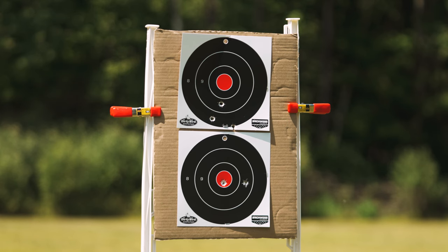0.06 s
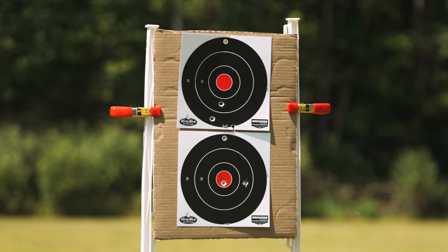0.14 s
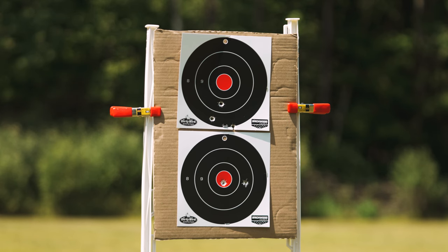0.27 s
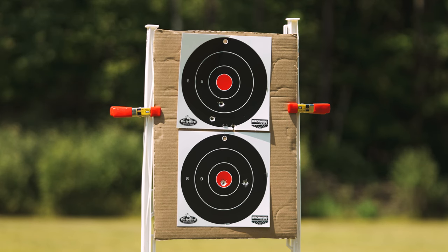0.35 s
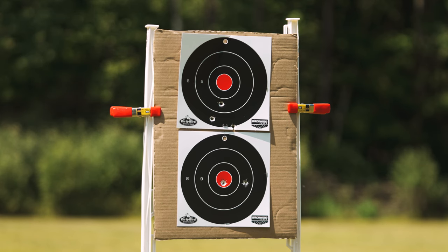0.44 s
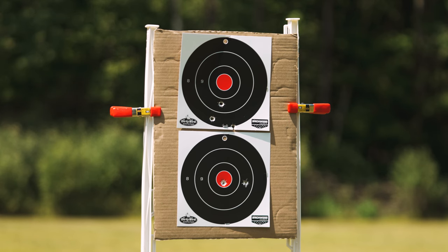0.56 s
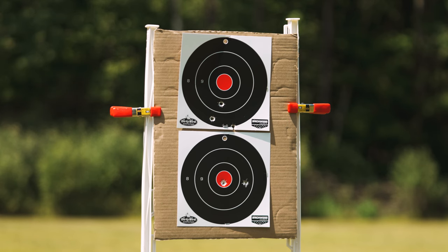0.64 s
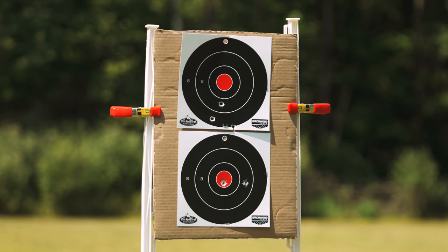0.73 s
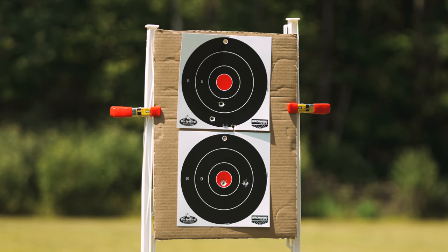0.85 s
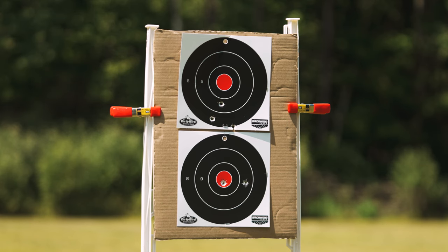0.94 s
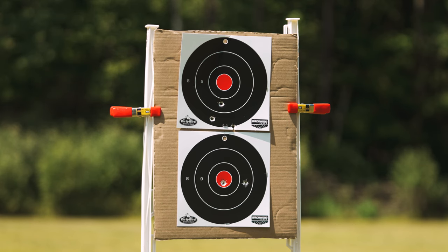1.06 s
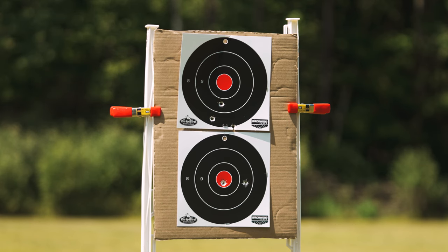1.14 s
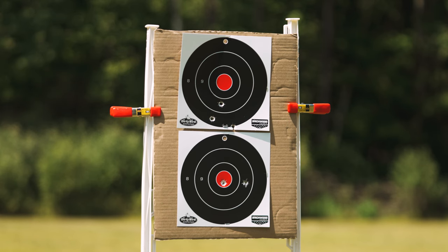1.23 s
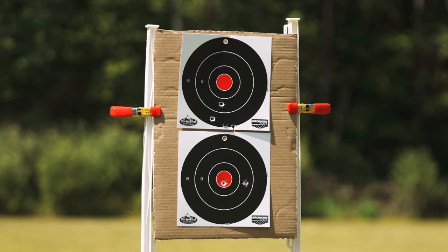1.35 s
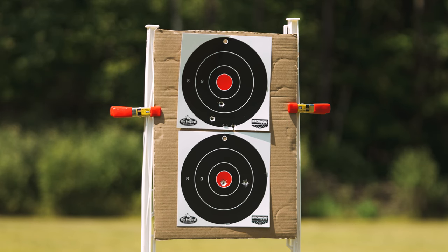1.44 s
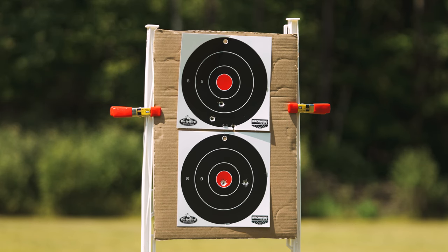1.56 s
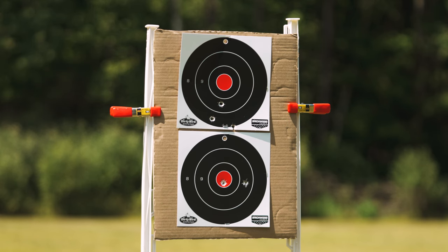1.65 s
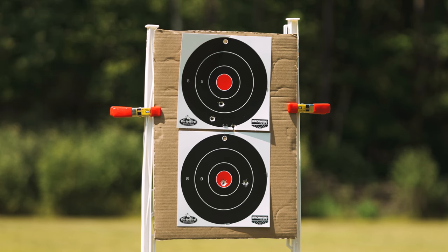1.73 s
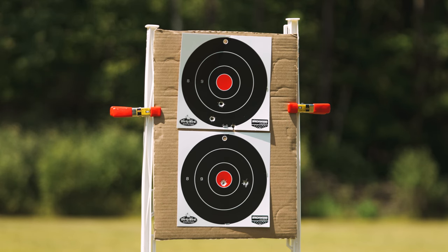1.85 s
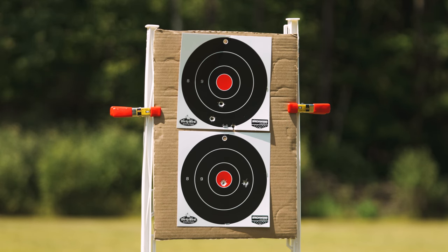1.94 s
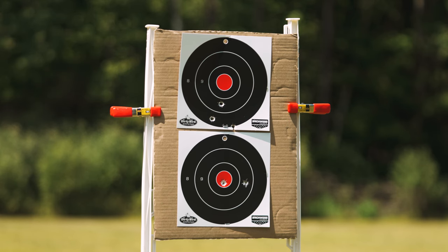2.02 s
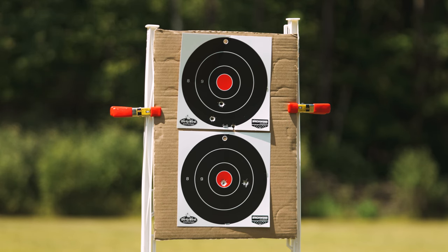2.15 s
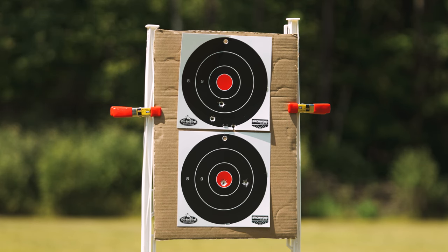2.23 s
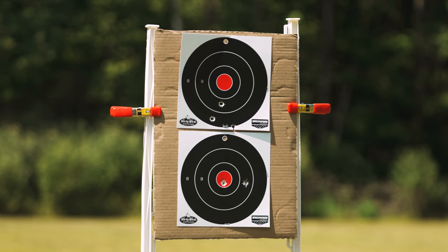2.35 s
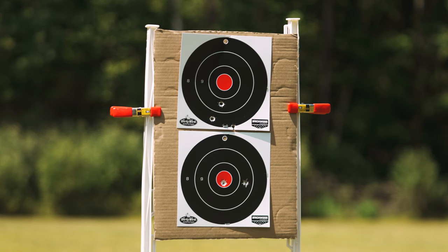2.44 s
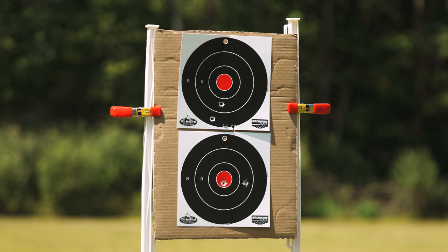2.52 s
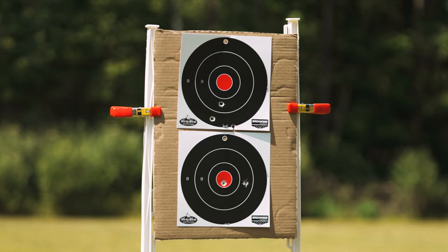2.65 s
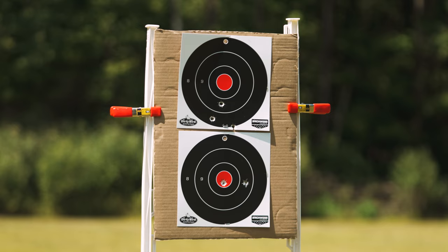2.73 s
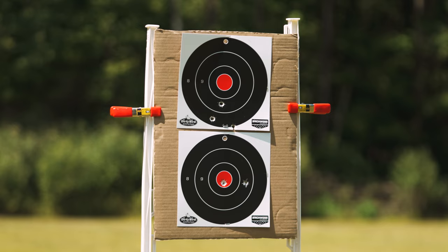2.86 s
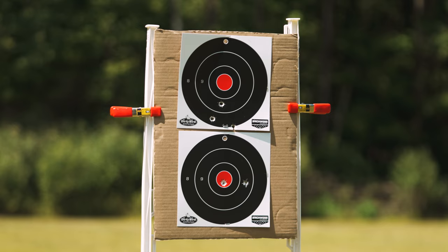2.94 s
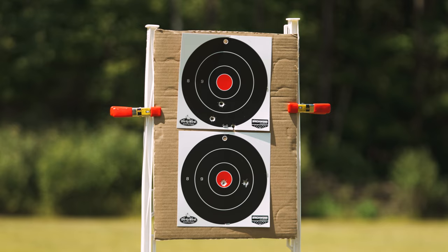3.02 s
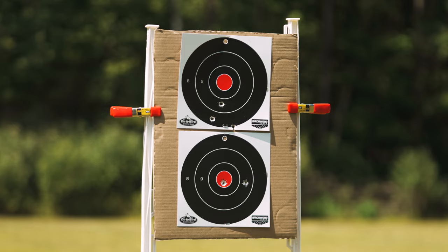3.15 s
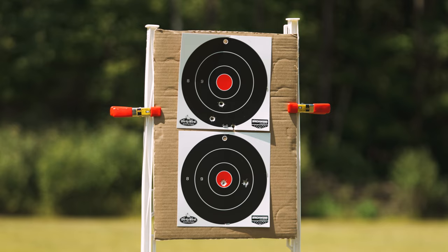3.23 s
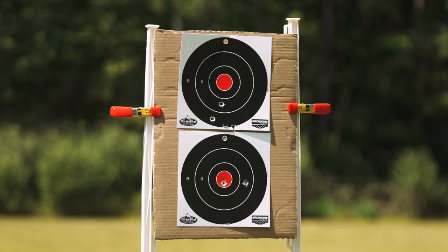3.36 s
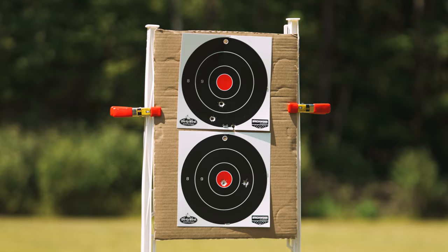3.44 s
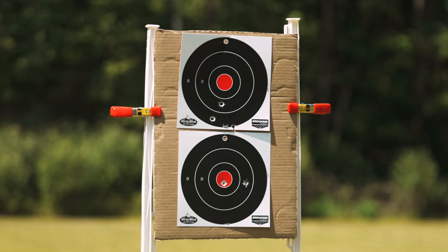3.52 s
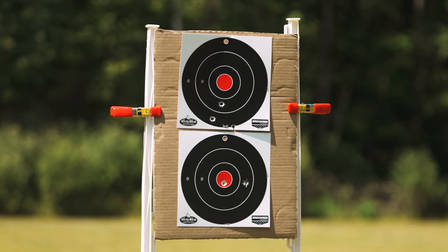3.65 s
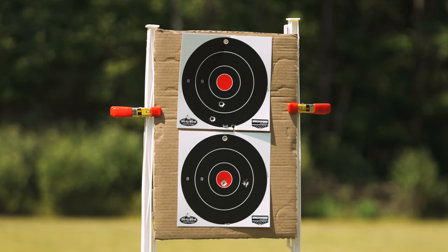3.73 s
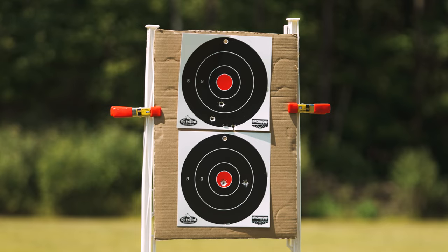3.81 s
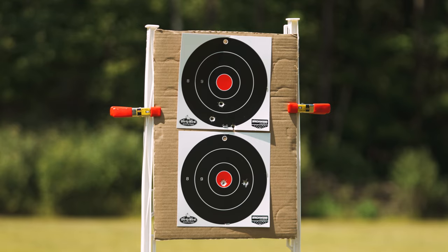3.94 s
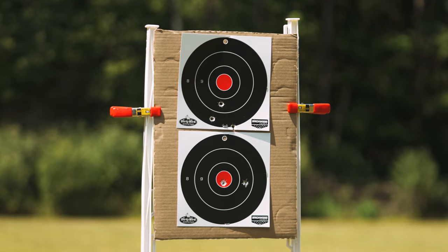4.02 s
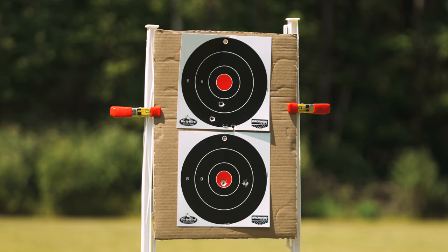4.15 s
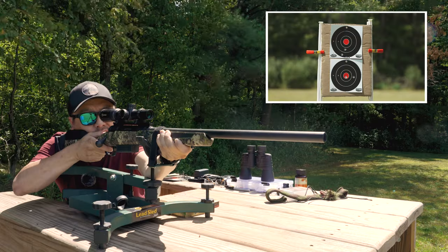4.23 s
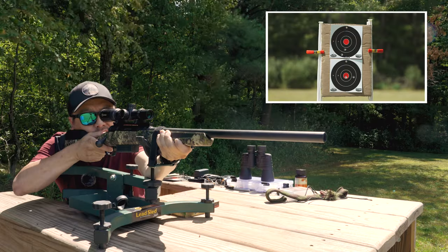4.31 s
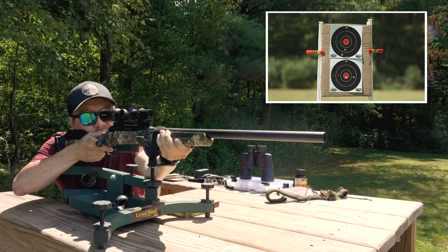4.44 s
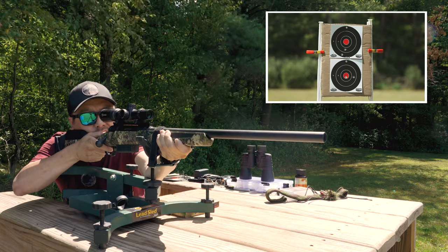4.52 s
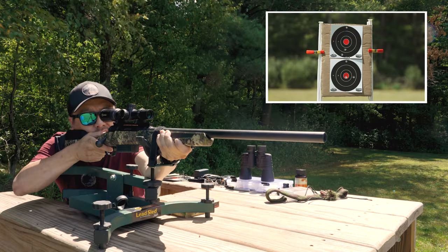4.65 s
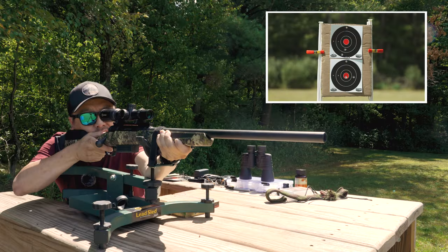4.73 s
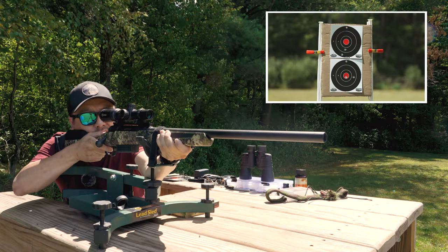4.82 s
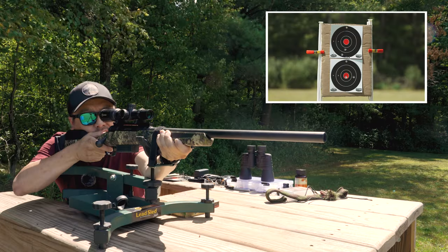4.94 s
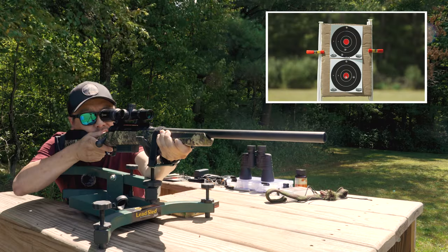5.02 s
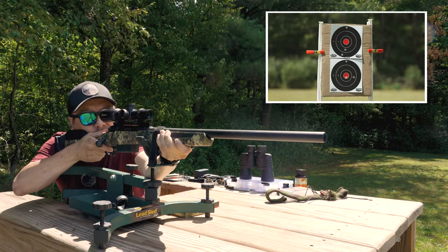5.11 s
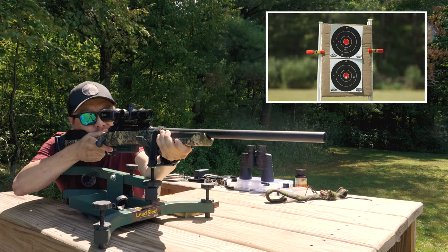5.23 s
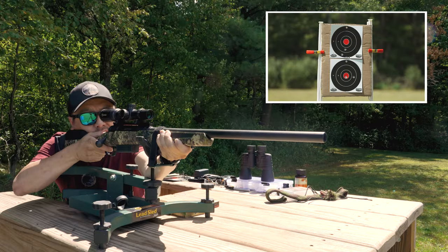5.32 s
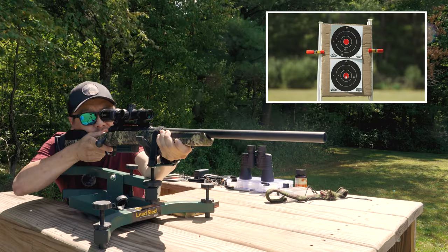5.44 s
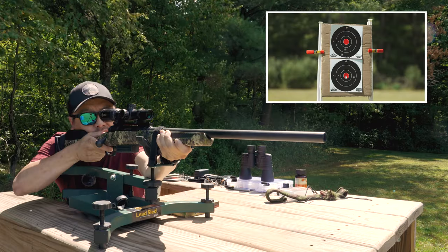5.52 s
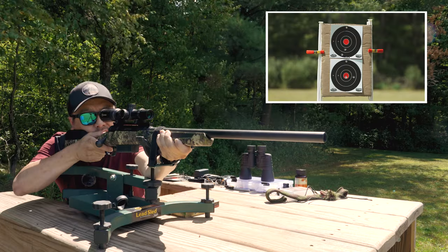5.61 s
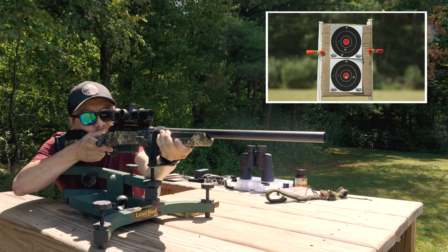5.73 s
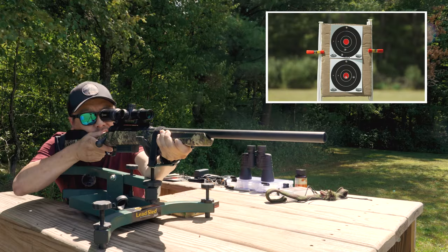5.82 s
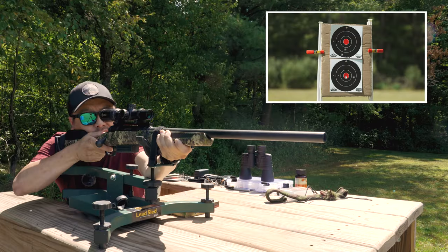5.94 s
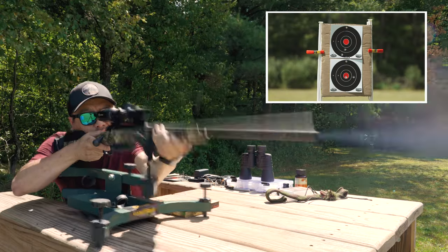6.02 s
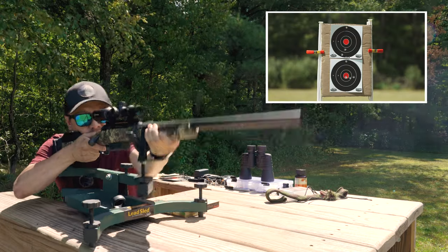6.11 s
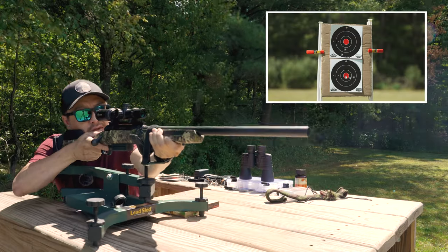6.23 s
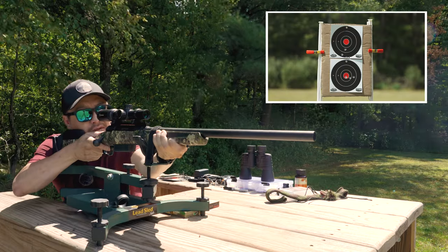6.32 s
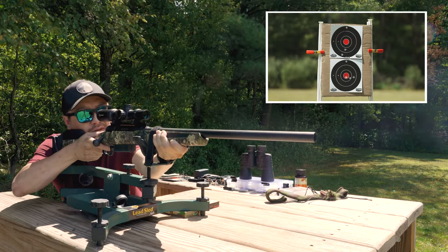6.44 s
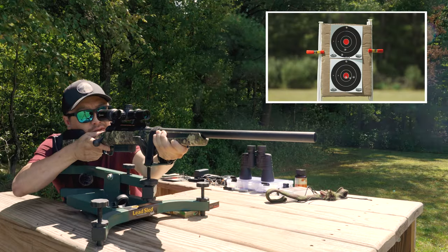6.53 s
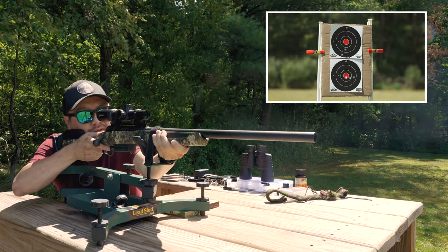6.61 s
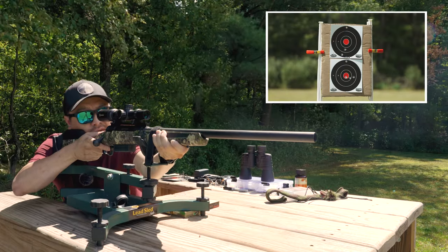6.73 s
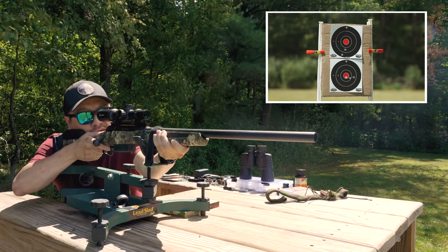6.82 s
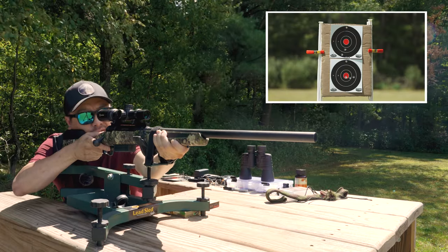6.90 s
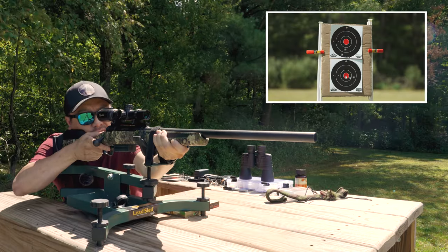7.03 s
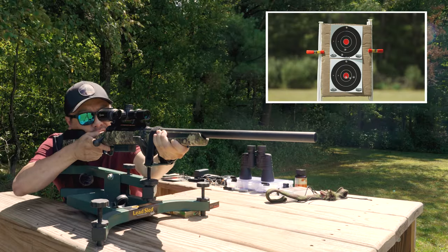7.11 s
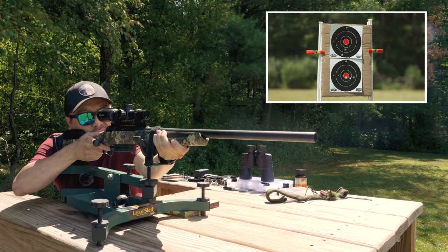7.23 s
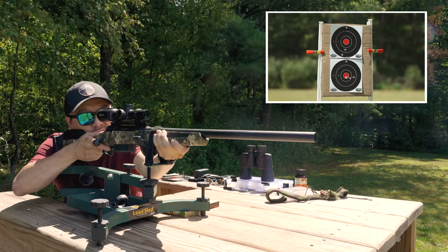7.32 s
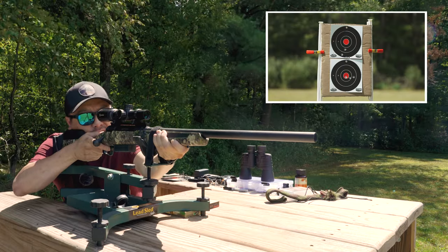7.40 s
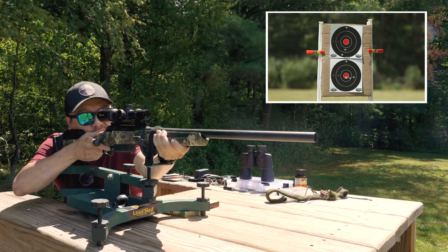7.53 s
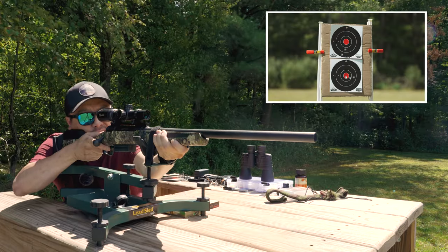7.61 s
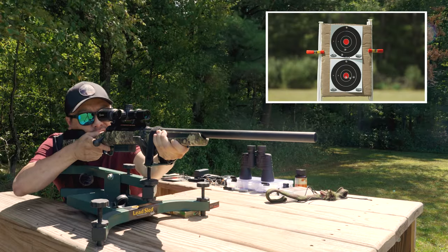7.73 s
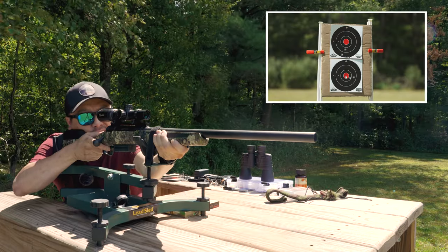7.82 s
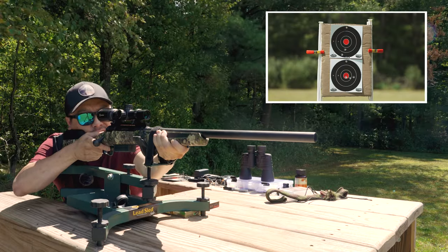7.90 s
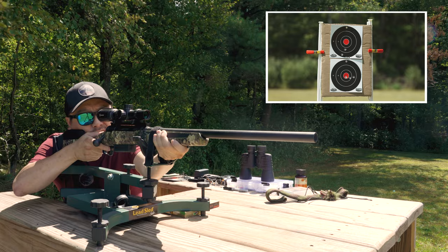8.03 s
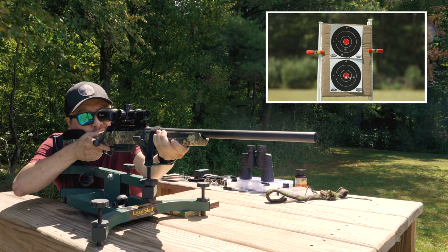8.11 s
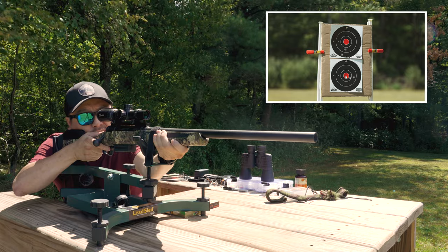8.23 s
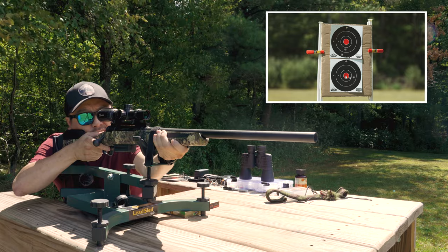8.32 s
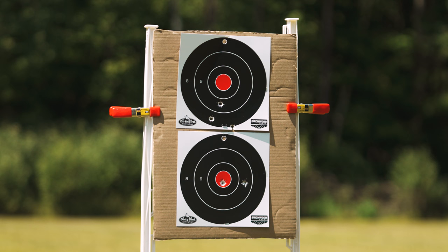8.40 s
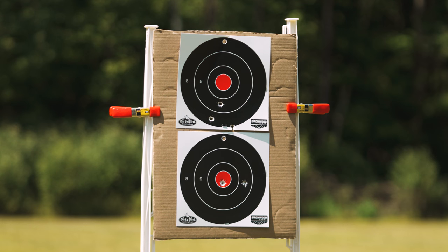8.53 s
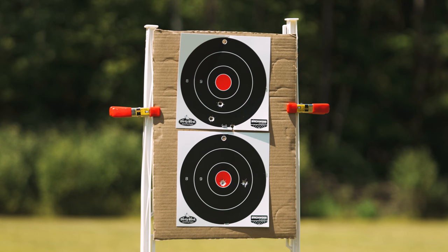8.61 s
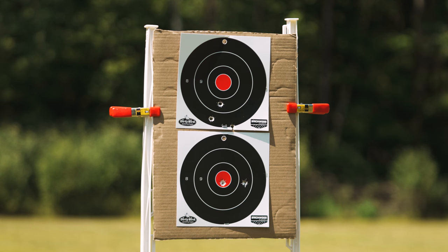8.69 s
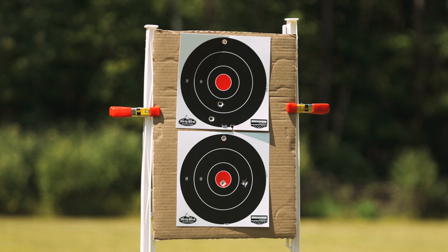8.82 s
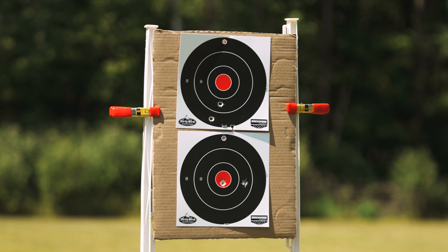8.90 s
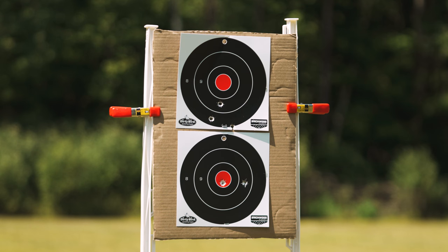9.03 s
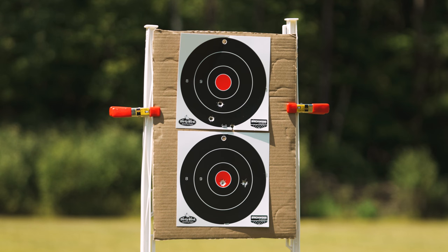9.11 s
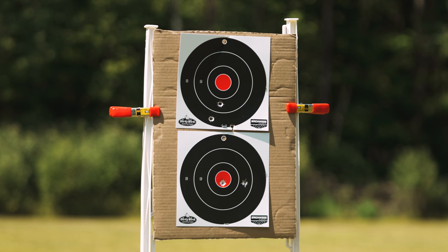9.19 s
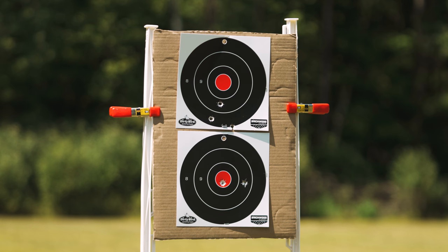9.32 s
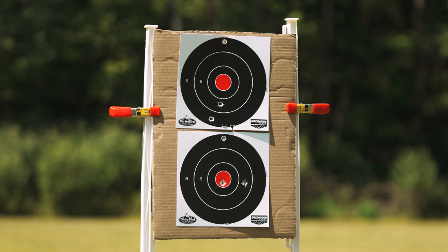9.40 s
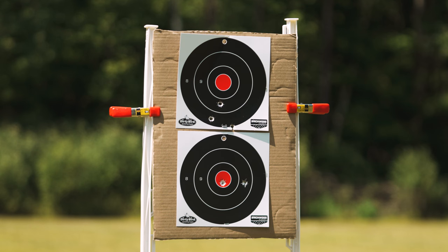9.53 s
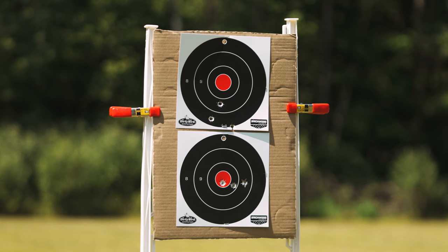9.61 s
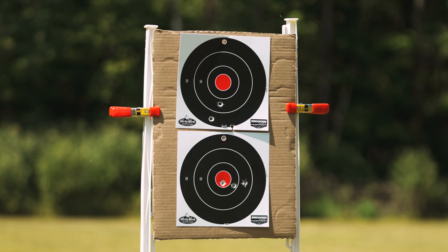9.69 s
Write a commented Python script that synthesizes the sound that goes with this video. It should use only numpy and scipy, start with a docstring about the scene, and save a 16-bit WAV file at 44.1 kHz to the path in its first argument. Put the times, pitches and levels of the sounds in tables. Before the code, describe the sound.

Close to a shooting bench outdoors: a bright metal tinkle with dwindling bounces, two groups of hard steel clicks with hollow knocks, then near silence with leaf hiss, light taps and brief wind rumble. A single distorted blast bursts out, thumping and choking the microphone, followed by a long noisy roll from the woods that loses its treble. Late metallic clacks, a bench bump and sliding steel end it.

```python
"""A shooting bench on a lawn ringed by woods. Leaves hiss faintly as a small metal part drops and bounces.
A gun's action is worked and snapped shut, and puffs of wind touch the microphone. One shot then overloads it
and rolls back from the trees, ever duller; afterwards the gun is handled again.
Struck metal and wood are sums of decaying modes and bursts of banded noise; scraping, leaves, wind and blast
are coloured noise under level curves; the roll is noise whose bands decay at their own rates."""
import sys
import numpy as np
from scipy import signal
from scipy.fft import rfft, irfft
from scipy.io import wavfile
from scipy.ndimage import uniform_filter1d

SR = 44100
rng = np.random.default_rng(int(sys.argv[2]) if len(sys.argv) > 2 else 0)


def output_pcm(signal):
    """Save a mono or channel-first signal as 16-bit PCM at the path in sys.argv[1].

    Samples are clipped to [-1, 1] before scaling.
    """
    pcm = np.clip(np.atleast_2d(signal).T, -1, 1) * 32767
    wavfile.write(sys.argv[1], SR, np.round(pcm).astype(np.int16))


N = 430416
TIME = np.arange(N) / SR  # s
SHOT_S = 6.1218


def undb(db):
    """Level to amplitude: 20 dB is a factor of ten."""
    return 10 ** (np.asarray(db) / 20)


def unit(x):
    """Normalisation by mean power: scale to rms 1."""
    return x / np.sqrt(np.mean(x ** 2) + 1e-18)


def colour(x, points):
    """Spectral shaping: weight x by (f/Hz, level/dB) points, joined over log frequency, at rms 1."""
    hz, db = np.transpose(points)
    bins = np.arange(len(x) // 2 + 1) * SR / len(x)
    gain = undb(np.interp(np.log(bins + 1), np.log(hz), db))
    return unit(irfft(rfft(x) * gain, len(x)))


def band(x, lo_hz, hi_hz, order=2):
    """Causal Butterworth band-pass."""
    edges = [lo_hz, min(hi_hz, SR / 2 - 1)]
    return signal.sosfilt(signal.butter(order, edges, "band", fs=SR, output="sos"), x)


def fade(t60, size=SR):
    """Exponential damping: amplitude falls 60 dB in t60 seconds."""
    return np.exp(-np.log(1000) * TIME[:size] / t60)


def burst(lo_hz, hi_hz, t60, size=8192):
    """High modal density: many dying resonances in one band act as fading noise, near rms 1 at first."""
    shape = fade(t60, size)
    noise = band(rng.standard_normal(size) * shape, lo_hz, hi_hz)
    return unit(noise) * np.sqrt(np.mean(shape ** 2))


def ring(modes, tilt_db=0, centre_hz=1000, scatter_db=3.0):
    """Modal superposition: a blow excites damped sines; tilt_db per octave sets its hardness."""
    hz, db, t60 = np.transpose(modes)
    scatter = scatter_db * rng.standard_normal(len(hz))  # no two blows are quite alike
    gain = undb(db + tilt_db * np.log2(hz / centre_hz) + scatter)
    out = 0
    for k in range(len(hz)):
        out = out + (-1) ** k * gain[k] * fade(t60[k]) * np.sin(2 * np.pi * hz[k] * TIME[:SR])
    return out


def add(out, s, x):
    """Linear superposition: mix x into out at time s."""
    i = min(max(int(s * SR), 0), N)
    out[i:i + len(x)] += x[:N - i]


def grains(spread_db, size=40):
    """Granular excitation: noise in short grains of uneven strength."""
    levels = np.repeat(rng.standard_normal(N // size + 1), size)[:N]
    return rng.standard_normal(N) * undb(spread_db * levels)


def walk(rate):
    """Slow random modulation: stepped noise, rate steps a second, smoothed and scaled to rms 1."""
    k = int(SR / rate)
    steps = np.repeat(rng.standard_normal(N // k + 1), k)[:N]
    return unit(uniform_filter1d(steps, k))


def held(s, hold, fall_db_per_s):
    """Exponential release: gain 1 until hold seconds after time s, then a steady fall in dB."""
    return undb(-fall_db_per_s * np.maximum(TIME - s - hold, 0))


def outdoors():
    """Turbulent noise: leaves hiss almost steadily; wind buffets under brief Gaussian envelopes."""
    # spectrum of the leaves: f/Hz, relative level/dB per Hz
    leaf_colour = [(22, -24), (45, -4), (90, 1.5), (160, 0.5), (280, 0), (480, 1.5), (780, -2),
                   (1300, -5.5), (2300, -12), (5200, -11.5), (8500, -12.5), (11500, -18), (14000, -16.5),
                   (16000, -30)]
    # spectrum of the wind: f/Hz, relative level/dB per Hz
    wind_colour = [(25, -7), (90, -3.5), (170, -3.5), (280, -10), (600, -27), (2000, -73)]
    # puffs on the microphone: t/s at the peak, half length/s (to 1/e), level/dB before flutter
    puffs = [(4.02, .022, -58), (4.32, 0.04546, -52.5), (4.66, 0.13, -53)]
    mean_leaves_db = -56
    leaves = colour(rng.standard_normal(N), leaf_colour) * undb(mean_leaves_db + .5 * walk(rate=2.9228))
    gust = sum(undb(db) * np.exp(-((TIME - s) / half) ** 2) for s, half, db in puffs)
    flutter = undb(2.68 * walk(rate=35))
    wind = colour(rng.standard_normal(N), wind_colour) * gust * flutter
    return leaves + wind


def dropped_part():
    """Impact excitation: each bounce is a hard contact tick and a short modal ring."""
    # bounces on the bench: t/s, level/dB, contact tick/dB relative to that level; the second row is the first
    # bounce coming back strongly from a surface nearby
    bounces = [(.0007, -13.5, 5.5), (.0145, -25, 1), (.2912, -19.5, 0), (.3418, -38, -1), (.4462, -23, 3),
               (.523, -28, -2), (.565, -34, -4), (.632, -45, -5), (.654, -40, 2), (.774, -48, -9),
               (.858, -41, 7), (.972, -48, 2), (.988, -52, 2), (1.041, -47, 3), (1.089, -52, 3)]
    # ring of the part: f/Hz, level/dB, t60/s
    part_modes = [(1324, -3.5, 0.042), (1356, -2.5, 0.036), (3490, 0, 0.02052), (3520, -21, .12),
                  (4400, -20, 0.018), (5500, -2.5, 0.019), (7205, -7, 0.014), (9370, -17, 0.02241),
                  (1550, -9.5, 0.021), (369.12, -25, 0.083)]
    out = np.zeros(N)
    for s, db, tick_db in bounces:
        # a harder tick also brightens the ring
        add(out, s, undb(db) * ring(part_modes, tilt_db=.5 * tick_db, centre_hz=3470))
        add(out, s, undb(db + tick_db) * burst(4041.6, 7650, t60=0.013))
        add(out, s, undb(db - 12) * burst(1270, 2250, t60=0.036))
    reflection_s, reflection_db = .0138, -25  # each bounce comes back once from a surface nearby
    add(out, reflection_s, undb(reflection_db) * out)
    return out


def surroundings(x):
    """Diffuse scattering: bench and lawn lay a faint, short tail behind close sounds by convolution."""
    middle = burst(360, 3200, t60=0.34, size=16384)
    treble = undb(1) * burst(3400, 11358, t60=0.27, size=16384)
    tail = middle + treble
    return x + undb(-22.0) * signal.fftconvolve(x, tail / np.linalg.norm(tail))[:N]


def action():
    """Impact and friction: steel clicks, scrapes between them, and knocks of breech and bench."""
    # steel meeting steel: t/s, level/dB, hollow body/dB, bright edge/dB (both before the band
    # trims below), t60/s of the 3400-7900 Hz band, from which the other bands are scaled
    clicks = [(1.162, -25, -3, -2, 0.02), (1.173, -30.5, -5, -11, 0.043), (1.265, -36, 2, 9, 0.033),
              (1.2705, -33, 0, 7, 0.0142), (1.283, -29, 5, -10.5, 0.02025), (1.2944, -13, -3.5, -3, 0.013),
              (1.3002, -26, 5, 4, 0.01345), (1.3192, -22.5, -17.5, 0, 0.018),
              (1.3256, -15.5, -5, -24.5, 0.013), (1.342, -21.5, -23, 9, 0.013),
              (1.358, -24.5, -3, -3, 0.01896), (1.3616, -19.5, -3.5, -10, 0.01808),
              (1.368, -17, -6, 10, 0.01903), (1.7523, -23.5, -15, -1, 0.01973),
              (1.7563, -13.5, -15, -2.5, 0.016), (1.7677, -23.5, -1, -6, 0.018),
              (1.7872, -35, -4, -7, 0.02645), (1.823, -45, 3.5, -18, 0.034),
              (1.8345, -28, -1, -19.5, 0.038), (1.8399, -8.5, -13, -5, 0.015),
              (2.748, -44.5, -11, -38, .03), (2.899, -38.5, -21, -46, 0.012),
              (3.455, -58, 9.5, -14, 0.0373), (3.685, -54, 6.5, -8, 0.03685),
              (3.788, -46.5, 7.5, -8.5, 0.0388), (3.7915, -33.5, -8, -25.5, 0.041),
              (3.8144, -37.5, -12, -30.5, 0.064), (3.884, -49, -17, 5, .015),
              (3.893, -48, -16.5, 5.5, 0.011), (4.0, -54, -9, -1, .03), (6.257, -16, -16, -11, 0.028),
              (6.358, -17, -17, -3.5, 0.01337), (8.532, -32, -3, -15.5, 0.0476),
              (8.5378, -20, -15, -12.5, 0.026), (8.5455, -28.5, -3, -34.5, 0.035),
              (8.849, -41, 2, -3, 0.014595), (9.035, -47.5, -8.5, -7, 0.052),
              (9.11, -47, -18.5, -20, 0.027), (9.2, -43.5, -12.5, 2, 0.042), (9.212, -43, -8, 1, .04),
              (9.224, -44, -23, 1, 0.04), (9.346, -44, -8, -2, 0.034), (9.621, -58.5, 14.5, -10.5, .04),
              (9.71, -49, 0, -11, 0.02173), (9.727, -26.5, -14, -9, 0.02883),
              (9.7412, -21, -1.5, -14, 0.025), (9.7442, -17.5, -11, -11, 0.016),
              (9.7475, -20, 2, -17, 0.01064)]
    # blows that set barrel and receiver ringing: t/s, level/dB
    rings = [(1.295, -42.5), (1.3686, -40.5), (1.8399, -44), (3.793, -57), (3.8146, -51.5), (8.5383, -44)]
    # their lasting ring: f/Hz, level/dB, t60/s
    gun_modes = [(1150, 2, 0.1496), (1592.3, -8, 0.25), (2010, 4, 0.14), (2902, 1, 0.23),
                 (3125.6, 6, 0.013), (3650, -17, 0.4578), (3846, -18, .3), (4750, -6.5, 0.088),
                 (6310, -19, 0.29), (7740, -23, .2), (9991, -14.5, .16)]
    # the breech coming to a hard stop: t/s, level/dB
    stops = [(1.2906, -7.5), (1.7575, -22), (9.7465, -27)]
    # its hollow knock: f/Hz, level/dB, t60/s
    breech_modes = [(533, -41, .7), (665, -7, .045), (850, -1, .036)]
    # the gun's weight bumping the bench: t/s, level/dB, hardness/dB per octave
    bumps = [(1.291, -47, 1), (1.367, -40, -2), (1.841, -41, 0), (1.856, -34, -2.5), (1.882, -39, -4),
             (3.455, -53, 5), (3.685, -61, 7.5), (3.816, -40, 5), (8.54, -30.5, 2), (9.737, -47, 9)]
    # the bench top and the shooting rest on it: f/Hz, level/dB, t60/s
    bench_modes = [(52.676, -19, 0.25), (84.516, -13.5, 0.29), (129.63, -15, 0.23), (187, -7.5, 0.1586),
                   (236.59, -5, 0.15), (333.5, -3, 0.11), (401.27, -1, 0.1014), (538, -16.5, 0.65),
                   (1178, -16.5, 0.2)]
    out = sliding()
    for s, db, body_db, edge_db, t60 in clicks:
        # a harder contact lifts the upper steel resonances along with the edge
        lower_steel = undb(-2.5) * burst(1890, 3220, 1.17 * t60)
        upper_steel = undb(-0.5 + .2 * edge_db) * burst(3400, 7900, t60)
        body = burst(450.57, 754, 2.0 * t60) + undb(-2.5) * burst(1010, 1480, 1.8252 * t60)
        edge = burst(6942, 13754, 0.93 * t60) + undb(-2.5) * burst(13000, 15300, 0.78 * t60)
        steel = lower_steel + upper_steel
        add(out, s, undb(db) * (steel + undb(body_db - 2) * body + undb(edge_db - 1.5) * edge))
    for s, db in rings:
        add(out, s, undb(db) * ring(gun_modes))
    for s, db in stops:
        add(out, s, undb(db) * ring(breech_modes))
    for s, db, hardness_db in bumps:
        add(out, s, undb(db) * ring(bench_modes, tilt_db=hardness_db, centre_hz=330))
    return out


def sliding():
    """Friction excitation: steel scrapes on steel in strokes that build up, hold and let go."""
    # strokes: t/s, hold/s, level/dB, rise/dB per s, fall/dB per s
    strokes = [(1.266, .09, -34, 900, 550), (1.37, .01, -50, 1200, 100), (1.4, .55, -64, 20, 40),
               (1.86, 0.00944, -50, 200, 130), (2.5, 0.054, -58, 14, 25), (8.58, 0.24, -54.5, 750, 250),
               (9.2, .05, -56, 100, 220)]
    # spectrum of the scrape: f/Hz, relative level/dB per Hz
    slide_colour = [(150, -13.5), (600, 7), (1200, -5), (2100, 4.5), (2500, 0), (2900, -1), (3400, -3.5),
                    (6000, -3.5), (10000, -9), (15000, -11)]
    sing_hz, sing_width_hz, sing_db = 2894, 70, -21  # the barrel sings faintly while it is scraped
    force = 0
    for s, hold, db, rise, fall in strokes:
        build_up_db = db - rise * np.maximum(s - TIME, 0)
        force = force + undb(build_up_db) * held(s, hold, fall)
    rub = grains(spread_db=2.5)
    sing = unit(band(rub, sing_hz - sing_width_hz / 2, sing_hz + sing_width_hz / 2, order=1))
    return force * (colour(rub, slide_colour) + undb(sing_db) * sing)


def muzzle_blast():
    """Saturation: shock and gas roar overload the microphone; a slow swing pins it and masks the rest."""
    # spectrum of the gas: f/Hz, relative level/dB per Hz
    blast_colour = [(60, -16), (400, 2.5), (1500, -0.5), (4000, -6.5), (8000, -6), (16000, -13.5)]
    # levels in dB over the overload level
    shock_db, shock_rise_s, shock_fall_db_per_s = 37, 0.002464, 4000
    roar_db, roar_hold_s, roar_fall_db_per_s, roar_top_hz = 10, 0.1062, 650, 6500
    gas = colour(rng.standard_normal(N), blast_colour)
    shock = undb(shock_db) * gas * held(SHOT_S, shock_rise_s, shock_fall_db_per_s)
    low_gas = unit(band(gas, 100, roar_top_hz, order=1))
    roar = undb(roar_db) * low_gas * held(SHOT_S, roar_hold_s, roar_fall_db_per_s)
    front = np.clip((TIME - SHOT_S) / shock_rise_s, 0, 1) ** 2
    pinned = np.tanh(front * (shock + roar) + pressure_swing())
    headroom = 1 - pinned ** 2  # slope of the saturation curve: what other sounds keep
    # the input stage passes no steady pressure: each pinned stretch thumps, then falls silent
    low_cut = signal.cheby1(2, 1.5, 125, "high", fs=SR, output="sos")
    return undb(-11.5) * signal.sosfilt(low_cut, pinned), headroom


def pressure_swing():
    """Slow overpressure and rarefaction: the air swings each way, far past what the microphone follows."""
    # swings: t/s after the shot, length/s, rise/s, fall/s, height/multiples of the overload level
    swings = [(.016, .06, .032, .001, 19), (.078, .045, .002, .023, -20)]
    # one spike breaks through the second swing: width to 1/e, height in multiples of the overload level
    spike_s, spike_half_width_s, spike_height = .0977, .0001, 21.8
    age = TIME - SHOT_S
    slow = 0
    for s, length, rise, fall, height in swings:
        onset = np.clip((age - s) / rise, 0, 1)
        release = np.clip((s + length - age) / fall, 0, 1)
        slow = slow + height * (onset * release) ** 2
    return slow + spike_height * np.exp(-((age - spike_s) / spike_half_width_s) ** 2)


def woods():
    """Multiple scattering: countless trunks return the shot; air absorbs the treble as the path grows."""
    # spectrum of the roll before absorption: f/Hz, relative level/dB per Hz
    roll_colour = [(40, -30), (90, -20), (150, -3.5), (230, -5.5), (320, -9.5), (480, 2), (720, 5.5),
                   (1050, 0), (1600, 0.5), (2600, -4.5), (4500, -11.5), (8000, -16.5), (12000, -24.5),
                   (16000, -38)]
    noise = colour(grains(spread_db=1.5), roll_colour)
    scatter = rfft(noise / np.std(band(noise, 510, 1460, order=4)))
    octave = np.log2(np.clip(np.arange(len(scatter)) * SR / N, 125, 16000))
    out = 0
    for hz in 125 * 2 ** (np.arange(15) / 2):
        # overlapping triangular half-octave bands that sum to one
        share = np.maximum(1 - 2 * np.abs(octave - np.log2(hz)), 0)
        out = out + irfft(scatter * share, N) * echo_level(hz)
    return out * undb(-0.33 + 0.3756 * walk(rate=50))


def echo_level(hz):
    """Energy summation: in one band each stand of trees swells in and decays, the treble fastest."""
    # stands of trees, near to far: t/s, rise/s, level/dB, tilt/dB per octave, loss at 5 kHz/dB,
    # t60/s before air loss
    echoes = [(6.236, 0.024, -20.5, -.5, -4.5, 2.7), (6.318, 0.025, -25, 2.3, -1.5, 3.7),
              (6.4, 0.045, -15, 3, 28, 5.3), (6.477, 0.088, -23.5, 2.4, 1.5, 1.8),
              (6.596, .02, -22.5, 4.4, 5.5, 1.7), (6.678, .067, -18.5, 2, 5.5, 2.4),
              (6.985, .032, -22.5, 1.5, 30, 2.36)]
    air_db_per_s, air_power = 33, 1.15  # further loss at 5 kHz as an echo travels on; growth with frequency
    deep_db, deep_t60_s = -18.5, 5.5  # share of each echo that lingers deep in the woods
    t, power = TIME[::64], 0
    octaves, absorbed = np.log2(hz / 1000), (hz / 5000) ** air_power
    for s, rise, db, tilt_db, loss_db, t60 in echoes:
        age = np.maximum(t - s, 0)
        near = np.exp(-np.log(1000) * age / t60)
        deep = undb(deep_db) * np.exp(-np.log(1000) * age / deep_t60_s)
        tone = undb(db + tilt_db * octaves - (loss_db + air_db_per_s * age) * absorbed)
        power = power + (np.minimum(age / rise, 1) * (near + deep) * tone) ** 2
    return np.interp(TIME, t, np.sqrt(power))


def scene():
    """Superposition at one microphone, which is deaf to other close sounds while it is overloaded."""
    blast, headroom = muzzle_blast()
    close = surroundings(dropped_part() + action())
    return (blast + woods() + headroom * (close + outdoors()))[None]


def record(dry):
    """Soft limiting and low-pass filtering: the recorder rounds the highest peaks and cuts the top."""
    top_hz = 15900
    rounded = dry / (1 + (dry / .7) ** 4) ** (1 / 4)
    return signal.sosfilt(signal.ellip(8, .2, 70, top_hz, fs=SR, output="sos"), rounded)


dry = scene()
out = record(dry)
output_pcm(out)
```